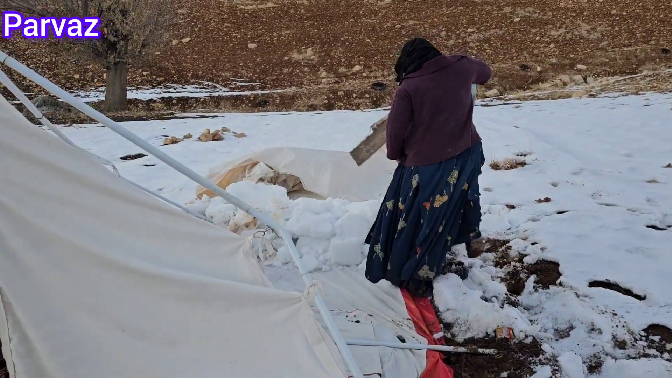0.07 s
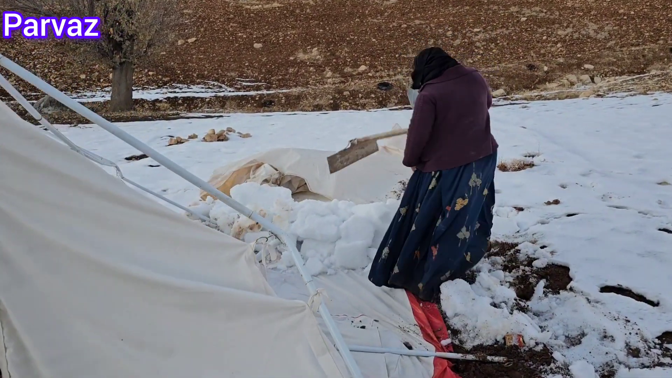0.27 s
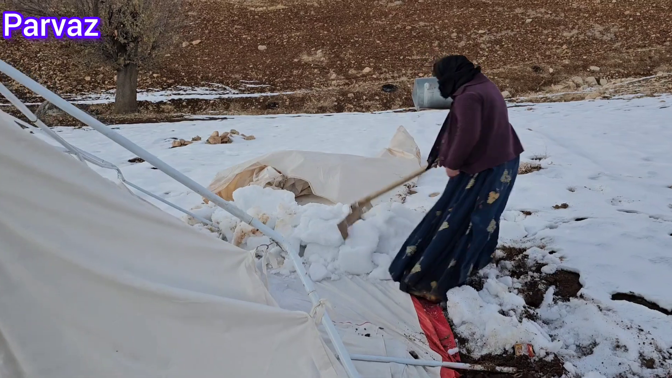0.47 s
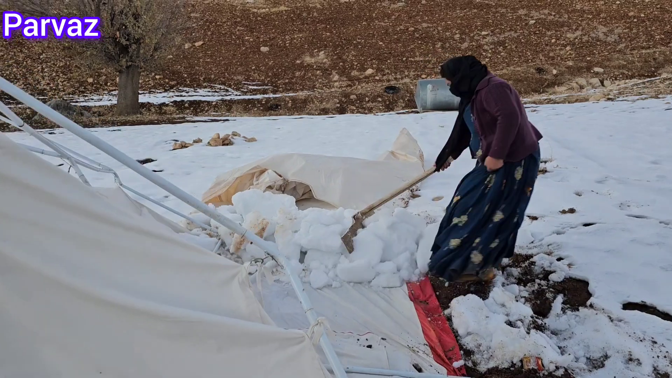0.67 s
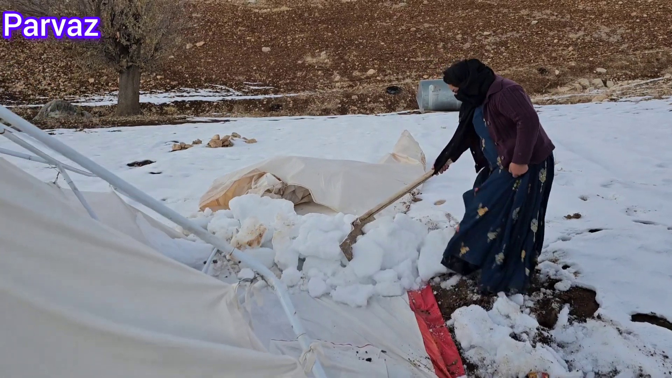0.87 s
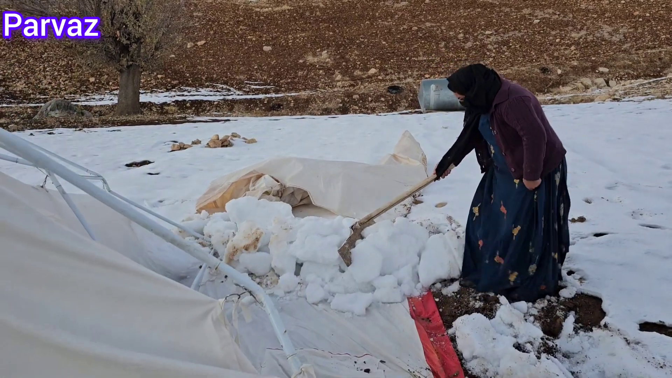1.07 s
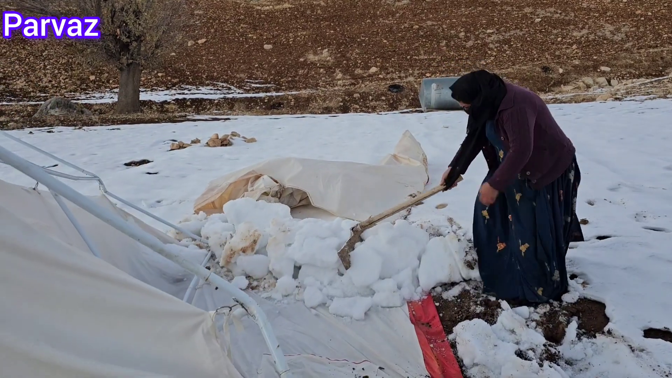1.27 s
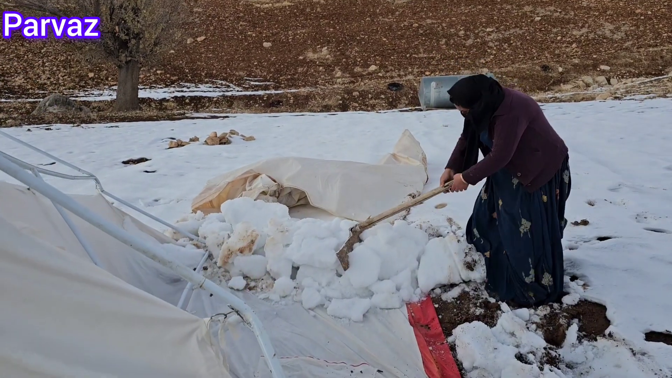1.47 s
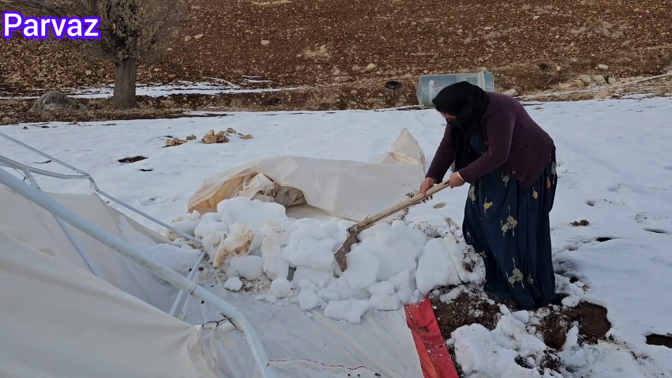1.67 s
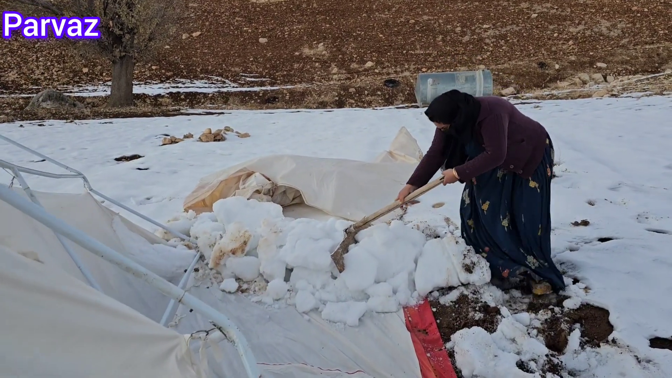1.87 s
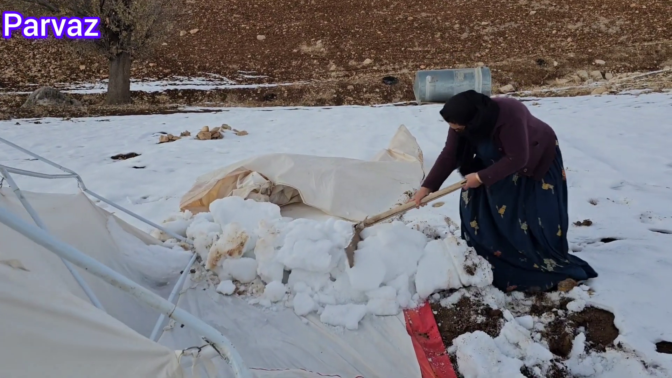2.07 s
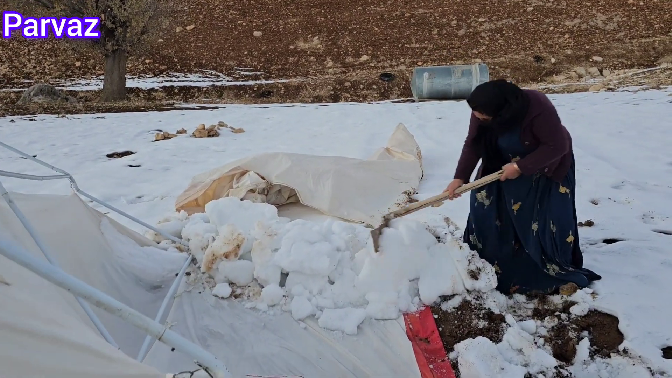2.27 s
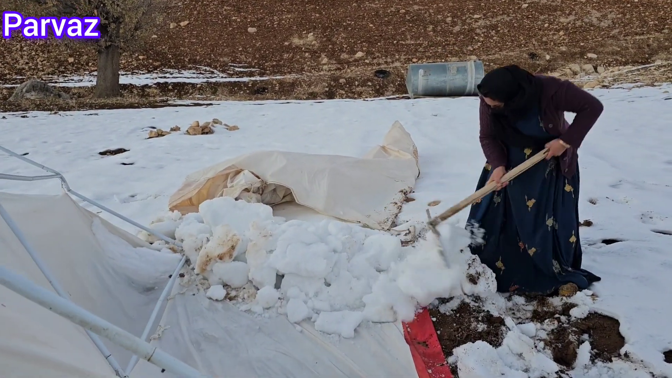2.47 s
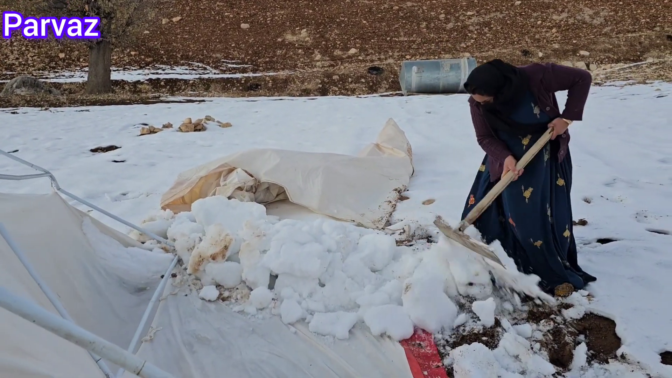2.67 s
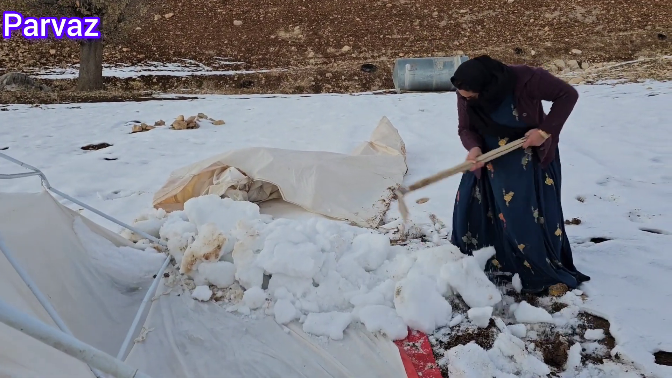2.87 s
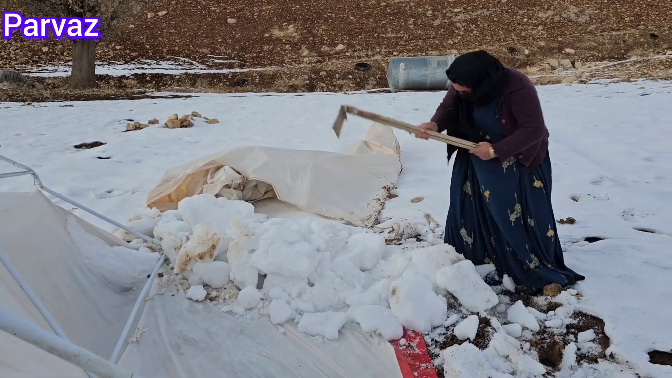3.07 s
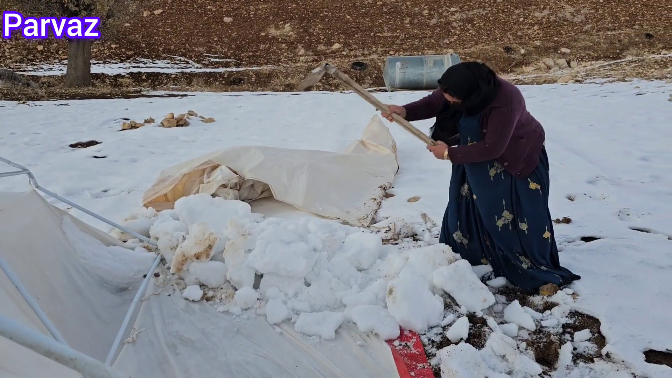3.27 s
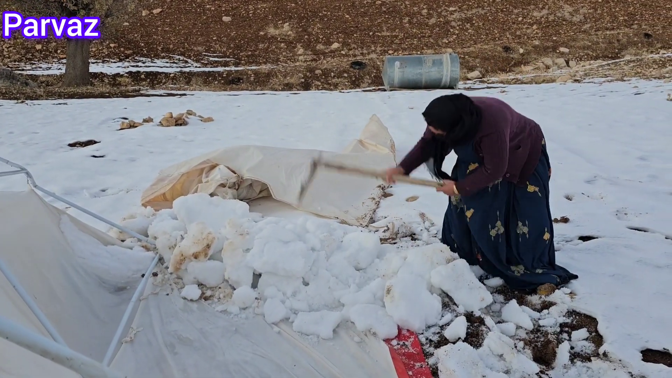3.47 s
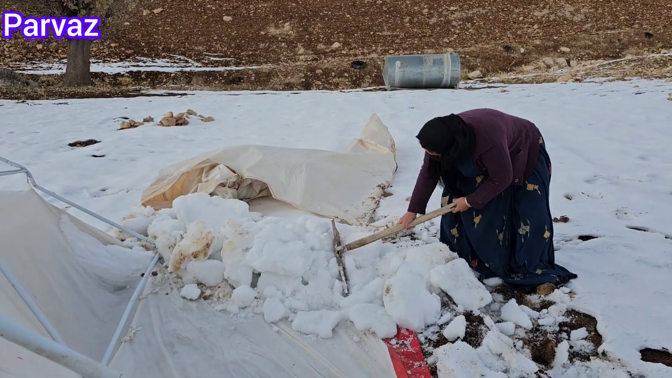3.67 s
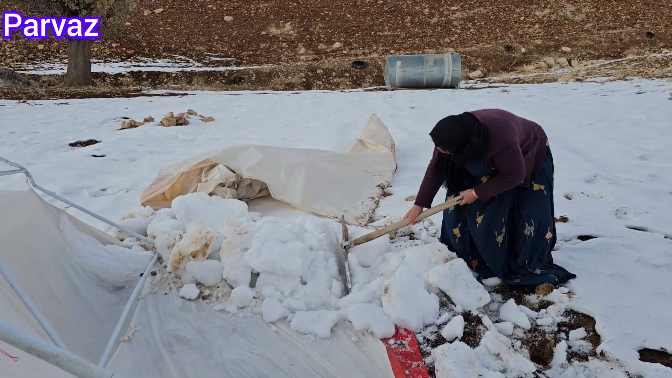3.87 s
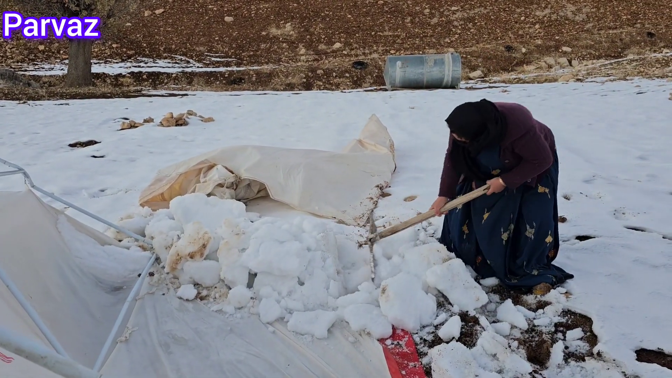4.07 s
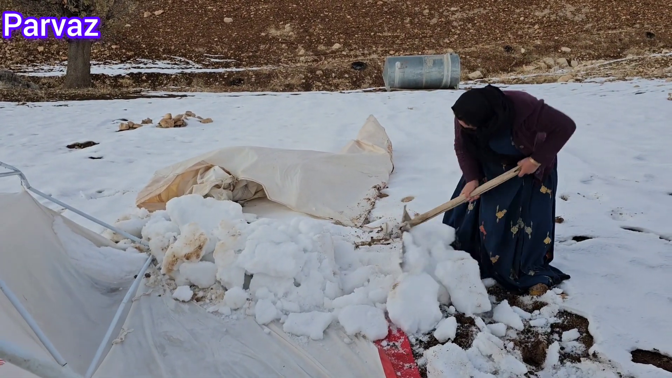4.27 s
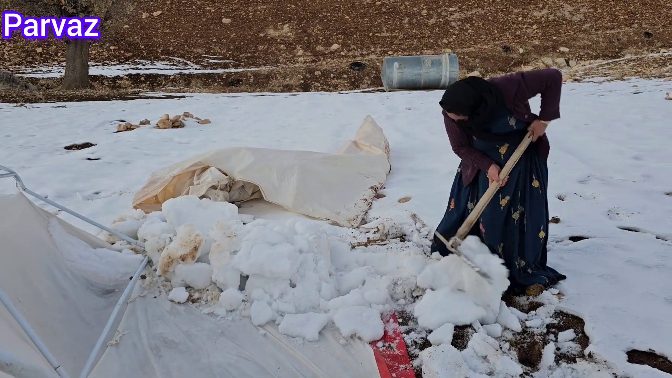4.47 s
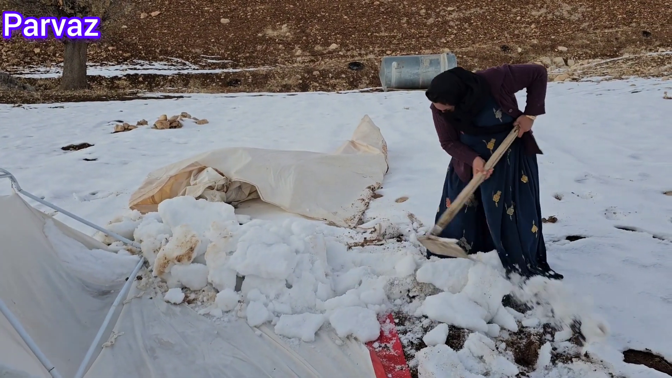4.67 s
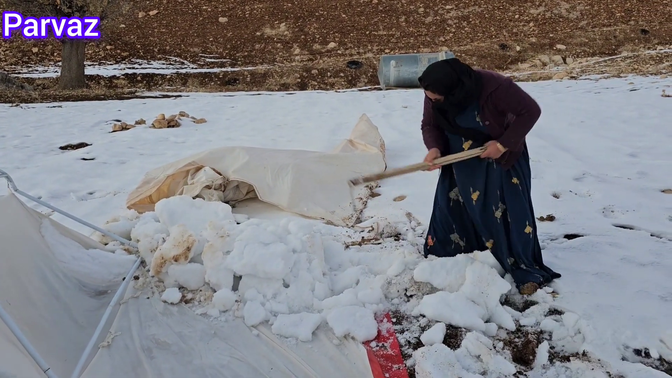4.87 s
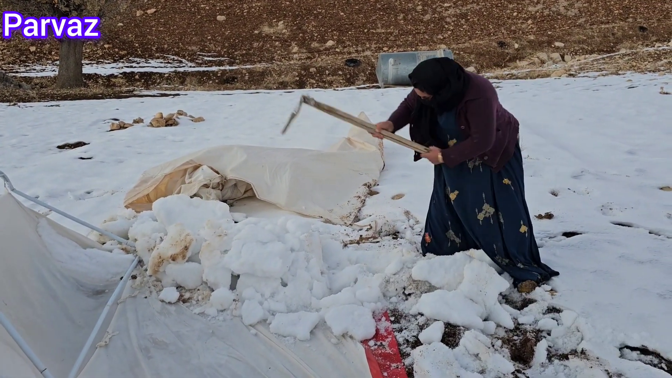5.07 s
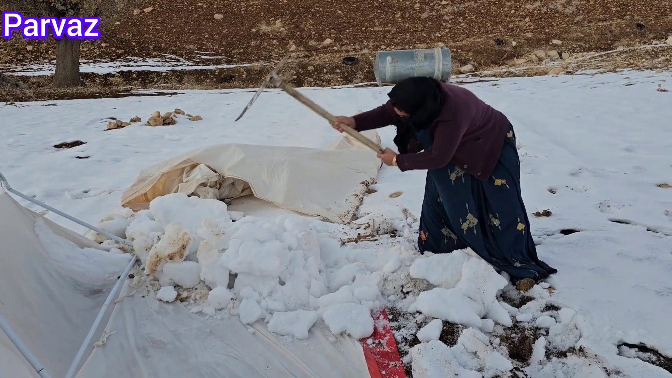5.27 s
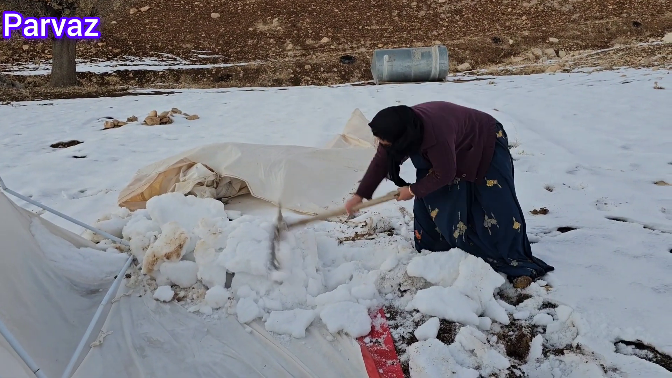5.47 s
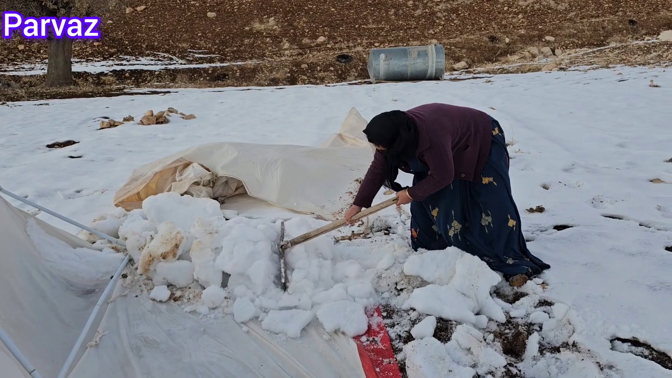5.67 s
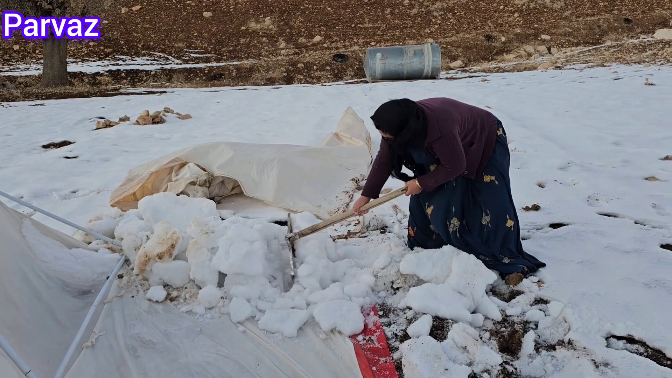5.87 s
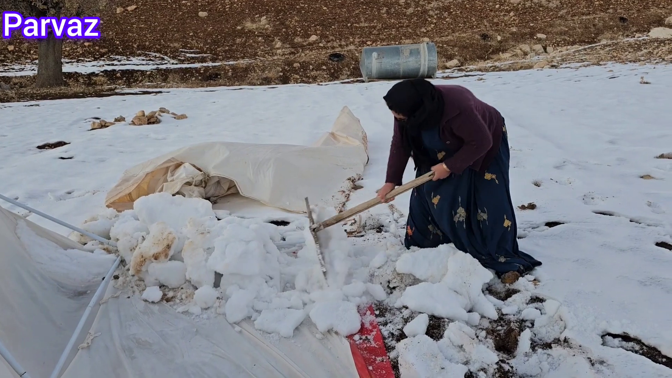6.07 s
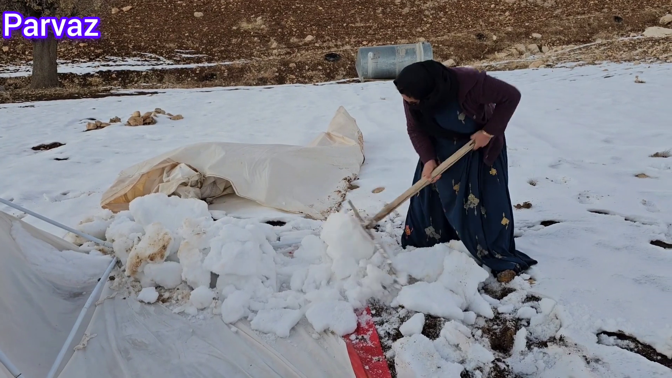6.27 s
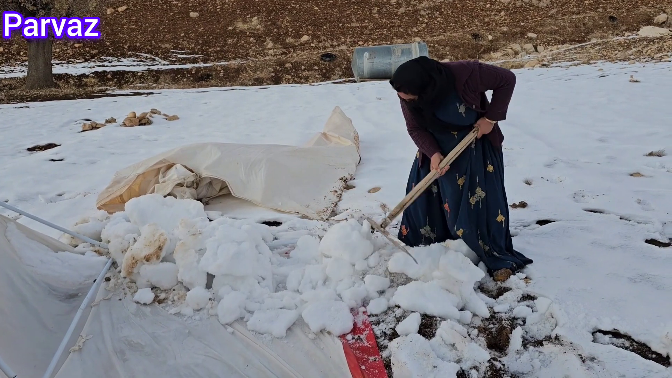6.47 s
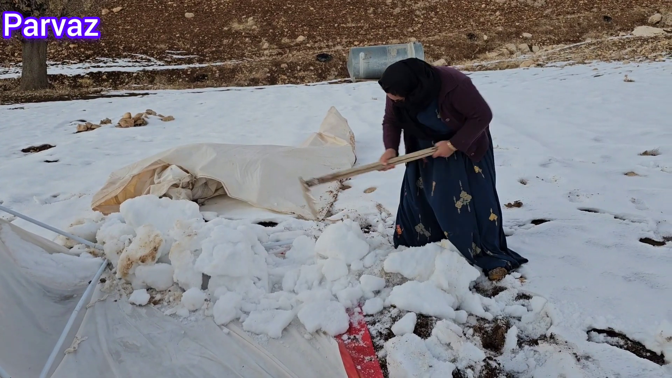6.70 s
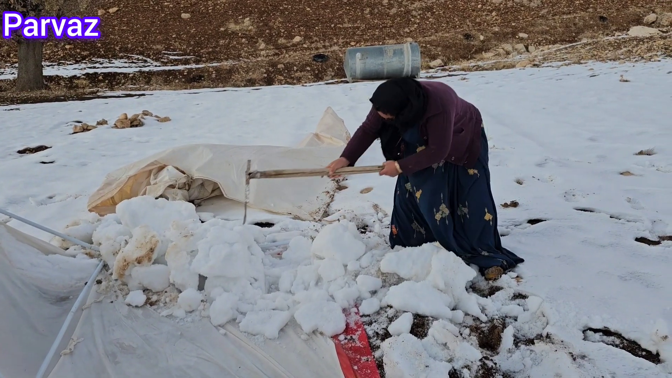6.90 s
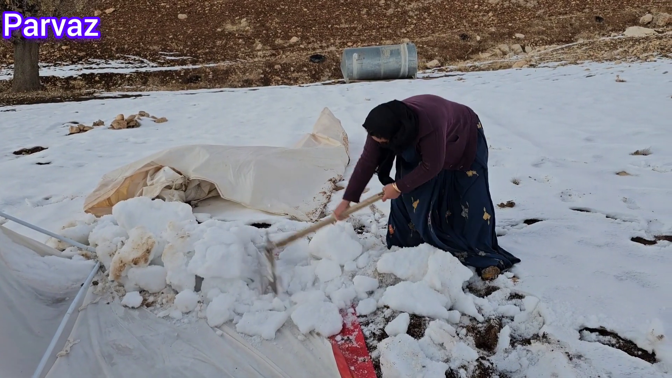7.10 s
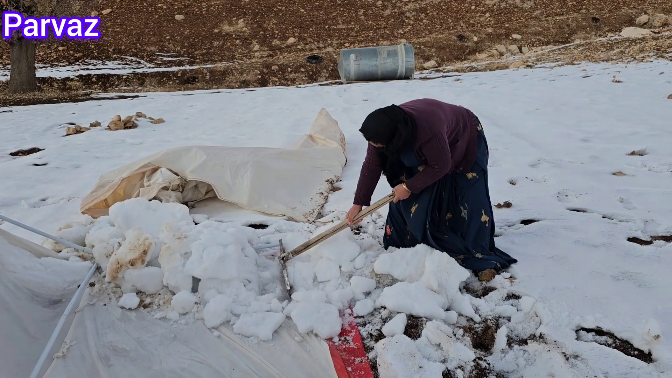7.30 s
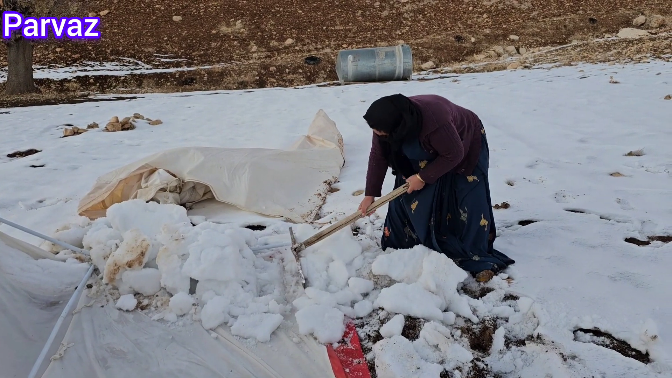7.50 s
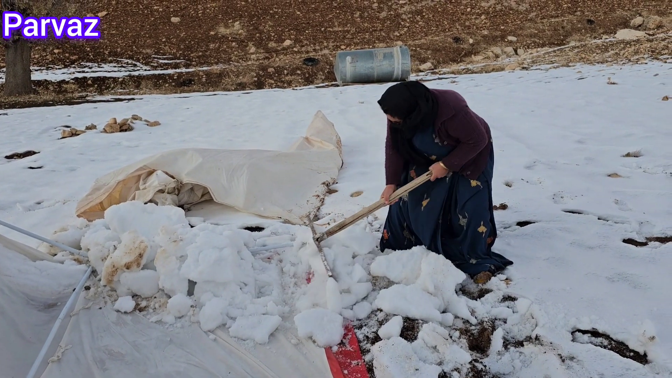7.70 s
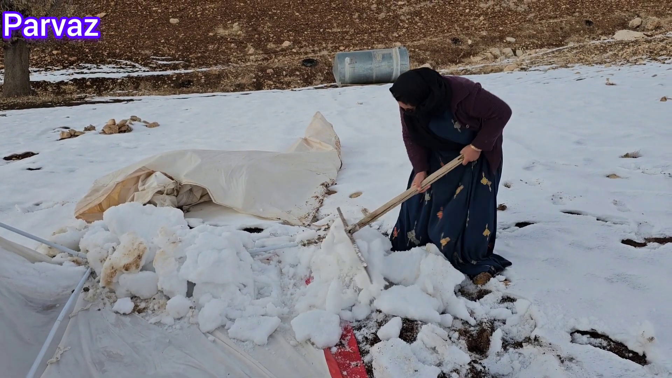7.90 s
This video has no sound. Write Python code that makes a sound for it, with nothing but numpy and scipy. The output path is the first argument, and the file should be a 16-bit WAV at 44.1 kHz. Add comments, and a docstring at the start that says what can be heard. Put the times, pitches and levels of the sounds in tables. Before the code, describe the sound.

A hoe bites into crusted snow a few steps away: four sharp, bright crunches with a very short steel ring, each followed by gritty dragging and dull lumps tumbling. Between strokes it quiets to fine trickling. A distant engine drones low underneath, and wind and handling thumps bump the hand-held stereo microphone early on.

```python
"""Hoe chopping crusted snow

A steel hoe chops four times into crusted snow and drags the lumps away, a few steps from a hand-held camera.
Snow is dense random grain clicks, filtered into crunch, dull lumps and powder; cracks and chops ring the blade.
Lumps and handling bumps are soft damped tones. A far engine drones as low tones and a roar of coloured noise;
wind buffets the two microphones as low noise in gusts."""
import sys
import numpy as np
from scipy import signal
from scipy.fft import rfft, irfft, next_fast_len
from scipy.io import wavfile
from scipy.ndimage import uniform_filter1d

SR = 44100
rng = np.random.default_rng(int(sys.argv[2]) if len(sys.argv) > 2 else 0)


def put_to_file(sound):
    """Save the sound as 16-bit audio at rate SR, in the file named by the first command-line argument."""
    columns = np.atleast_2d(sound).T  # one column per channel
    safe = np.clip(columns, -1, 1)
    whole_steps = np.round(safe * 32767)
    wavfile.write(sys.argv[1], SR, whole_steps.astype(np.int16))


N = 350154  # length in samples


def amp(db):
    """Decibels to gain."""
    return 10 ** (np.asarray(db) / 20)


def evened(x):
    """Scales to rms 1."""
    return x / np.sqrt(np.mean(x ** 2) + 1e-20)


def smooth_noise(shape, size):
    """Slowly wandering noise of rms 1: white noise averaged twice over a window of size samples."""
    noise = rng.standard_normal(shape)
    return evened(uniform_filter1d(uniform_filter1d(noise, size=size), size=size))


def read(points, hz):
    """Reads a (frequency, value) table on a log-frequency axis."""
    f, value = np.transpose(points)
    return np.interp(np.log(hz + 1), np.log(f + 1), value)


def columns(tables):
    """Per-sample values of every column, and a mask that is 1 while a table lasts."""
    t = np.arange(N) / SR
    s, *values = np.vstack(tables).T
    on = sum((t >= rows[0][0]) & (t < rows[-1][0]) for rows in tables)
    soft_on = uniform_filter1d(on * 1., size=44)  # 1 ms edges
    return soft_on, [np.interp(t, s, v) for v in values]


def add(mix, at, sound):
    """Mixes a sound in at a sample index."""
    mix[:, at:at + sound.shape[1]] += sound


def pair(near, far, gain, same, lag_s=0, lead=((0, 0), (1, 0)), patchy_db=0, pitched_db=0, size=256):
    """Colours two signals and mixes them into left and right of given likeness and delay."""
    overlap = size * 3 // 4
    hz, t, (a, b) = signal.stft([near, far], SR, nperseg=size, noverlap=overlap)
    same = np.clip(read(same, hz), 0, 1)[:, None]
    lag_now = np.interp(t * SR, np.arange(N), lag_s * np.ones(N))
    late = np.exp(-2j * np.pi * hz[:, None] * lag_now)  # the right side hears it later
    late *= np.exp(-1j * read(lead, hz))[:, None]
    wide, narrow = rng.standard_normal((2, *a.shape))
    wide = uniform_filter1d(uniform_filter1d(wide, size=5, axis=0), size=16, axis=1)  # drifting patches
    narrow = uniform_filter1d(narrow, size=14, axis=1)  # short grains that each favour one pitch
    mottle = evened(amp(patchy_db * evened(wide) + pitched_db * evened(narrow)))
    left_right = np.array([a, late * same * a + np.sqrt(1 - same ** 2) * b])
    coloured = left_right * gain(hz)[:, None] * mottle
    return signal.istft(coloured, SR, nperseg=size, noverlap=overlap)[1][:, :N]


def grains(per_s, spread_db, clumps):
    """Two trains of tiny fractures, mostly small and a few large, coming in clumps."""
    size = amp(spread_db * np.minimum(rng.exponential(1, (2, N)), 4)) * rng.standard_normal((2, N))
    struck = rng.random((2, N)) < per_s / SR
    return evened(size * struck * clumps)


def snow(levels, colour, same, rates, spread_db, flicker_db, patchy_db, pitched_db):
    """Breaking snow in three registers: crunch through the blade, dull lumps and fine powder."""
    # where the blade is: (time [s], delay of the right microphone [microseconds])
    blade_lag = [(0, 27), (1.5, -7), (2.002, -20), (2.898, -111), (3.5, 24.5), (5.401, 71), (6.3, 13),
                 (7.099, 31), (7.94, -2)]
    lag_s = np.interp(np.arange(N) / SR, *np.transpose(blade_lag)) * 1e-6
    clumps = amp(flicker_db * smooth_noise(N, 200))  # all registers break together for some milliseconds
    out = np.zeros((2, N))
    bands_hz = [(2300, 8200), (250, 2300), (8200, 17000)]  # crunch, lumps, powder
    for level, (lo, hi), per_s in zip(levels, bands_hz, rates):
        def gain(hz):
            edges = 1 / np.sqrt((1 + (lo / (hz + 1)) ** 12) * (1 + (hz / hi) ** 12))
            shape = amp(read(colour, hz)) * edges
            return shape / np.sqrt(np.mean(shape ** 2))
        near, far = level * grains(per_s, spread_db, clumps)
        out += pair(near, far, gain, same, lag_s, patchy_db=patchy_db, pitched_db=pitched_db)
    return out


def registers(on, crunch_db, lumps_db, powder_db):
    """Gains of the three registers from a crunch level and two offsets."""
    return on * amp([crunch_db, crunch_db + lumps_db, crunch_db + powder_db])


def drag():
    """Loose snow dragged, sliding and trickling: finer grains, spread wide between the microphones."""
    # one table a movement: (time [s], crunch level [dB], powder re crunch [dB])
    movements = [
        [(0.0, -66, 0), (0.038, -62, -3.5), (0.218, -66.5, -5), (0.262, -77.5, -2), (0.348, -59.5, 3),
         (0.425, -62, -2)],
        [(0.5, -40.5, -10), (0.562, -58, -3), (0.598, -55.5, -8), (0.618, -63.5, -3), (0.83, -61.5, -3),
         (0.852, -50, -15), (0.866, -60.5, -10), (0.966, -59, 0), (1.05, -74, -7)],
        [(1.05, -71, 0), (1.134, -79, -7), (1.154, -77, -8), (1.39, -66.5, -2.5), (1.458, -69, -11),
         (1.682, -74, -4.5), (1.93, -67, -6)],
        [(1.93, -72, -9), (1.946, -55.5, -12), (1.994, -43, -13), (2.034, -48, -7), (2.174, -39, -7.5),
         (2.222, -50.5, -6), (2.262, -35, -11), (2.306, -46.5, -7), (2.33, -40, -10), (2.406, -49.5, -4),
         (2.416, -45, -6), (2.466, -52.5, -2), (2.498, -37, -23), (2.53, -47, -8), (2.546, -38, -4),
         (2.6, -42.5, -13)],
        [(2.6, -42, -7), (2.736, -51, -5), (2.774, -47.5, -1), (2.87, -55, 0), (3.172, -70.5, -7),
         (3.306, -76, -28), (3.33, -84, -9)],
        [(3.6, -58, -1), (3.644, -63.5, -1), (3.738, -68.5, -1), (3.75, -55, -12), (3.766, -66, -3),
         (3.83, -48, -9), (3.948, -54, -4), (4.09, -46, -8.5), (4.124, -56.5, -3.5), (4.394, -39, -9.5),
         (4.428, -48, -5), (4.488, -49, -2), (4.62, -65, 3)],
        [(4.62, -59, 5), (4.668, -64, 5), (4.68, -52.5, 5.5), (4.912, -67.5, 5), (4.934, -67, 2),
         (5.092, -75, 9), (5.3, -85, -12.5)],
        [(5.5, -35.5, -6), (5.558, -47, -10.5), (5.568, -55, -4), (5.732, -53.5, -1), (5.794, -56.5, -5),
         (5.828, -55.5, -0.5), (6.002, -51, -5), (6.192, -44, -6.5), (6.204, -44, -8), (6.216, -56, 0),
         (6.29, -54.5, 0.5), (6.354, -64, 3), (6.36, -76, -2)],
        [(6.36, -63.5, -1), (6.406, -53, -4.5), (6.542, -71, 6.5), (6.558, -64.5, 10), (6.722, -77.5, 2.5),
         (6.742, -87, 8), (6.754, -65, -7), (6.9, -103, -8)],
        [(7.165, -55, -4), (7.193, -57, -5), (7.231, -64, -5), (7.349, -48.5, -9), (7.575, -46.5, -10),
         (7.755, -53.5, -5.5), (7.819, -50, -7), (7.861, -44.5, -9), (7.94, -44, -9)],
    ]
    # spectrum of sliding snow: (frequency [Hz], relative density [dB per Hz])
    colour = [(180, -25), (300, -12), (360, -11), (485, 0), (633, -15), (825, -7), (942, -17.5),
              (1040, -11.5), (2200, -11), (2420, -15), (3100, -9), (3670, -8.5), (5300, -12.5), (7600, -17),
              (9450, -21), (10600, -24.5), (12300, -19), (15800, -24.5)]
    # left-right match: (frequency [Hz], likeness [0 to 1])
    same = [(300, 0.39), (1700, 0.66), (3800, 0.59), (6000, 0.41), (8000, 0.096), (15800, .1)]
    on, (crunch_db, powder_db) = columns(movements)
    # lumps follow the crunch, less steeply, and trickling powder carries few of them
    lumps_level_db = -53 + 0.55 * (crunch_db + 47.5) - 0.28 * powder_db
    levels = registers(on, crunch_db, lumps_level_db - crunch_db, powder_db)
    grains_per_s = [9000, 3500, 12000]
    return snow(levels, colour, same, grains_per_s, spread_db=0.67, flicker_db=0.78,
                patchy_db=0.6, pitched_db=2.0)


def engine_tones():
    """Two low orders of the far engine's firing rate, and a second, weaker low tone."""
    # engine speed and tones: (time [s], firing rate [Hz], firing level [dB], second multiple level [dB])
    firing = [(0, 60.65, -33.5, -52), (.4, 59.68, -44, -49.5), (.75, 59.83, -35.5, -48.5),
              (1.15, 59.66, -42.5, -51), (1.6, 58.92, -47.5, -52.5), (1.9, 58.52, -40.5, -54),
              (2.6, 58.07, -42.5, -55), (3.3, 59.2, -43.5, -56), (4.5, 58.6, -44, -51.5),
              (5.5, 58.15, -44, -52), (6.3, 58.96, -43, -55), (6.8, 58.9, -40.5, -50.5),
              (7.4, 59.84, -46, -47.5), (7.65, 56.8, -41, -48), (7.94, 57.7, -40.5, -48.5)]
    # the second low tone: (time [s], frequency [Hz], level [dB])
    drone = [(1.3, 104.9, -58), (1.8, 102, -51.5), (2.4, 100.1, -48.5), (4, 100.7, -55), (5.5, 98.1, -55),
             (6.7, 104.1, -53.5), (7.2, 106.2, -54), (7.94, 105.2, -53)]
    _, (hz, first_db, second_db) = columns([firing])
    turn = 2 * np.pi * np.cumsum(hz) / SR
    first, second = amp(2.54 * smooth_noise((2, N), 3000))  # moving air makes the far tones swell and sink
    on, (drone_hz, drone_db) = columns([drone])
    tones = amp(first_db) * first * np.sin(turn)
    tones += amp(second_db) * second * np.sin(2 * turn + 1.3)
    tones += on * amp(drone_db) * np.sin(2 * np.pi * np.cumsum(drone_hz) / SR)
    return np.sqrt(2) * tones  # levels are rms


def engine_roar():
    """Smooth noise with the humps of the engine's exhaust."""
    # roar spectrum: (frequency [Hz], relative density [dB per Hz])
    colour = [(100, -33), (150, -22.5), (200, -15.5), (330, -15.5), (470, -0.5), (600, -6), (800, -13.5),
              (1150, -15.5), (1400, -7), (1800, -16.5), (2400, -32), (3600, -31), (5000, -47), (15800, -55)]
    # left-right match: (frequency [Hz], likeness [0 to 1])
    same = [(130, 0.65), (350, 0.37), (500, .8), (900, 0.17), (1400, 0.43), (3000, 0.69), (6000, .1)]
    # phase between the microphones: (frequency [Hz], lead of the left [radians])
    lead = [(200, 2.2), (500, 1.55), (900, 4.2), (1400, -1.1), (2500, 0.23)]
    roar = pair(*rng.standard_normal((2, N)), lambda hz: amp(read(colour, hz)), same, lead=lead,
                patchy_db=0.5, pitched_db=2.5, size=1024)
    return amp(-56) * evened(roar)


def wind():
    """Lumpy low buffeting, partly alike at both microphones, stronger on the windward left."""
    # gust strength: (time [s], level [dB])
    gusts = [(0.0, -50), (0.26, -40), (0.4, -50.5), (0.7, -44), (0.97, -38.5), (1.08, -49), (1.15, -34.5),
             (1.25, -44.5), (1.7, -56), (1.99, -43.5), (3.01, -49.5), (3.71, -48), (5.2, -48.5),
             (5.42, -45), (5.68, -46.5), (6.19, -46.5), (6.9, -52.5), (7.14, -39), (7.3, -48.5),
             (7.94, -48)]
    # buffeting spectrum: (frequency [Hz], relative density [dB per Hz])
    colour = [(15, -16.5), (30, 8), (45, 1), (80, 6.5), (110, -2), (150, -13.5), (250, -21), (500, -31),
              (900, -65)]
    # balance of the wind: (time [s], left minus right [dB])
    balance = [(0, 18), (1.3, 12), (2.5, 1), (4, 6), (7.94, 0.5)]
    gust = amp(columns([gusts])[1][0] + 2.3 * smooth_noise(N, 2500))
    lean_db = columns([balance])[1][0] / 2
    same = [(20, 0.85), (80, 0.58), (200, 0.83)]  # (frequency [Hz], likeness [0 to 1])
    flow = pair(*rng.standard_normal((2, N)), lambda hz: amp(read(colour, hz)), same, size=4096)
    return gust * amp([lean_db, -lean_db]) * evened(flow)


def knock(s, db, hz, rise, t60, lean_db, second):
    """A soft, damped tone with a weaker partner of chance pitch and phase."""
    t = np.arange(SR // 2) / SR
    ratio, turn = second
    partner_hz = hz * (1.7 + 0.383 * ratio)
    tone = np.sin(2 * np.pi * hz * t) + .5 * np.sin(2 * np.pi * (partner_hz * t + turn))
    decay = amp(db - 60 * np.maximum(t - rise, 0) / max(t60, .01))
    shape = np.minimum(t / max(rise, .001), 1) * decay
    return round(s * SR), amp([[lean_db / 2], [-lean_db / 2]]) * shape * tone


def bumps():
    """Low thumps through the camera body as it is handled, louder at the left port."""
    # handling thumps: (time [s], level [dB], pitch [Hz], rise [s], t60 [s])
    thumps = [(0.045, -29.5, 75.3, 0.0059, 0.19), (0.202, -28.5, 60, 0.017, 0.28),
              (0.482, -37.5, 62.4, 0.014, 0.29), (0.689, -33, 62, 0.087, 0.12),
              (.935, -29, 71.2, 0.0137, 0.23), (1.14, -29.5, 78, 0.0061, 0.081)]
    out = np.zeros((2, N + SR))
    for row, second in zip(thumps, rng.random((len(thumps), 2))):
        add(out, *knock(*row, lean_db=11, second=second))
    return out[:, :N]


def cracks():
    """Gains of single cracks: a rise of a few milliseconds, a short spray and a faint patter of crumbs."""
    # cracks of crust and ice: (time [s], crunch level [dB], lumps re crunch [dB], powder re crunch [dB])
    breaks = [(0.152, -52, 7, 4), (0.207, -60, 13.5, 5), (0.4448, -41, -16, -21), (0.4675, -16, -20, -22),
              (0.7322, -47.5, -14, -8), (0.848, -35.5, 0.5, -2.5), (1.195, -60, -10, 3),
              (1.2171, -55, -5, -23), (1.596, -65, 10, 6), (1.9751, -48, -9, -24), (2.2358, -31, -19, -21),
              (2.326, -31.5, -10, -20), (2.4915, -30, 6.5, 1.5), (2.548, -33.5, 8.5, 0),
              (2.6188, -32, 1.5, -6), (2.6591, -47, 8, -11), (2.784, -46, 14, 8), (3.0042, -44, 1, -21),
              (3.0924, -52.5, 8.5, 1), (3.241, -53.5, 4, -10), (3.3544, -41, -1, -5), (3.3604, -53, 9, -8),
              (3.5334, -18.5, -24, -25), (3.5375, -13, -11.5, -18), (3.5507, -33, -18, -23),
              (3.7475, -46, -12, -21), (3.861, -40, 1, -21), (4.6765, -43, -7, -5),
              (4.938, -48.5, -11, 6.5), (5.0046, -55, -7, -7), (5.444, -20.5, -24, -13),
              (5.461, -16, -15, -15.5), (5.4734, -17.5, -0.5, -28), (5.4853, -16.5, -6, -17),
              (5.5507, -35, -18, -14), (5.5575, -48, -18, -23), (5.84, -40.5, -3, -17),
              (6.0926, -40, -23, -19), (6.406, -53, 12, -15), (6.558, -50, -13, 3), (6.701, -59, -15, 2),
              (6.7543, -58.5, -3, -17), (6.8294, -62.5, 0, -6), (7.1056, -23, -20, -8),
              (7.1163, -25, -13.5, -20), (7.135, -28, 2.5, -21.5)]
    power = np.zeros((3, N + SR))
    t = np.arange(SR // 4) / SR
    spray = amp(-60 * t / 0.023)  # t60 23 ms
    patter = amp(-21 - 60 * t / 0.18)  # t60 180 ms
    shape = np.minimum(t / 0.0044, 1) * (spray + patter)
    for s, *levels_db in breaks:
        add(power, round(s * SR), registers(shape[None], *np.array(levels_db)[:, None]) ** 2)
    return np.sqrt(power[:, :N])


def chop(start, entry_db, bite_s, stop_db, lumps_db, powder_db):
    """Corner points of one blow: first contact, entry, stop, end of the fall."""
    entry_s, entry_rise_db, fall_s, fall_db = 0.016, 14.5, .035, 29
    lumps_gain_db = 0.5  # lumps grow as the blade digs in
    early_powder_db = powder_db + 5  # powder sprays mostly at first contact
    stop = start + max(bite_s, 2 * entry_s)
    return [(start, entry_db - entry_rise_db, lumps_db, early_powder_db),
            (start + entry_s, entry_db, lumps_db, early_powder_db),
            (stop, stop_db, lumps_db + .5 * lumps_gain_db, powder_db),
            (stop + fall_s, stop_db - fall_db, lumps_db + lumps_gain_db, powder_db)]


def ring(x):
    """The steel blade rings briefly at its modes, each decaying faster the wider it is."""
    # steel modes, damped by snow: (frequency [Hz], width [Hz], relative level [dB])
    blade_modes = [(3260, 89, -4.5), (3735, 45, -0.5), (4350, 72, -5), (4920, 180, 4.5), (5357, 62, 3.5),
                   (6710, 110, -2), (7680, 52, 0)]
    t = np.arange(2000) / SR
    modes = sum(amp(db) * np.exp(-np.pi * width * t) * np.sin(2 * np.pi * hz * t)
                for hz, width, db in blade_modes)
    return signal.oaconvolve(x, modes[None] / np.linalg.norm(modes), axes=1)[:, :N]


def blows():
    """Chops and cracks: snow breaking at one spot and shaking the blade."""
    # the blade bites, crunches on until it stops, then the sound falls away: (start [s], entry level [dB],
    # bite length [s], stop level [dB], lumps re crunch at entry [dB], powder re crunch at the stop [dB])
    bites = [(0.431, -36, 0.046, -24.5, -11, -16.5), (3.53, -30, 0.046, -30, -8, -10.5),
             (5.439, -24.5, 0.041, -22, -11, -11.5), (7.1, -33, 0.033, -32.5, -6.5, -6)]
    # spectrum of chopped snow: (frequency [Hz], relative density [dB per Hz])
    colour = [(180, -51), (300, -16.5), (366, -20.5), (536, -8.5), (665, -13), (974, -14), (1400, -10),
              (2390, -10), (3440, 0), (4870, -1.5), (5650, -2), (7490, -4), (10600, -10), (11900, -6.5),
              (15800, -14)]
    # left-right match: (frequency [Hz], likeness [0 to 1])
    same = [(300, 1), (1700, 0.83), (4500, 0.37), (7500, 0.58), (9500, 0.12), (15800, 0.6)]
    on, blow_db = columns([chop(*row) for row in bites])
    levels = np.hypot(registers(on, *blow_db), cracks())
    grains_per_s = [15000, 8000, 20000]
    broken = snow(levels, colour, same, grains_per_s, spread_db=1.0, flicker_db=-1.1,
                  patchy_db=1.44, pitched_db=2.5)
    return broken + amp(-12) * ring(broken)


def lumps():
    """Short dull knocks of the blade stopping and of lumps dropping in the snow."""
    # knocks: (time [s], level [dB], pitch [Hz], t60 [s], left minus right [dB])
    drops = [(0.923, -43.5, 407, 0.033, 0.0), (0.939, -36.5, 162, 0.052, 3), (0.962, -38, 169, 0.019, 1.0),
             (1.144, -47, 181, 0.025, 24), (1.998, -46, 425, 0.083, 7), (2.048, -45, 445, 0.076, 5),
             (2.331, -44, 482, 0.077, -6), (2.488, -39.5, 820, 0.12, -2), (2.782, -46, 702, 0.049, 1),
             (3.256, -47.5, 180, 0.1, 20), (3.54, -35, 218, 0.093, -7), (3.56, -40, 177, 0.037, -10),
             (4.276, -47.5, 510, 0.085, -5.5), (4.345, -43.5, 768, 0.23, -3), (4.384, -43.5, 490, 0.11, -2),
             (4.472, -45, 478, 0.075, -1), (4.558, -52, 540, 0.081, 6), (5.457, -31, 238, 0.067, -3.5),
             (5.462, -34.5, 176, 0.091, -3), (5.471, -35, 517, 0.054, -8), (5.743, -51, 238, 0.08, 2),
             (5.923, -42, 256, 0.061, -1), (7.114, -41, 247, 0.079, -6), (7.132, -33.5, 235, 0.049, -7),
             (7.549, -43.5, 476, 0.066, -1), (7.894, -49, 510, 0.07, 6)]
    out = np.zeros((2, N + SR))
    for (s, db, hz, t60, lean_db), second in zip(drops, rng.random((len(drops), 2))):
        add(out, *knock(s, db, hz, .004, t60, lean_db, second))
    return out[:, :N]


def scene():
    """Everything that reaches the microphones."""
    hoe = drag() + blows() + lumps()
    engine = engine_tones() + engine_roar()
    return hoe + engine + wind() + bumps()


def record(dry):
    """The two microphone ports lean left or right by frequency; then the band limit."""
    # balance of the ports: (frequency [Hz], left minus right [dB])
    ports = [(60, -5), (350, -3.5), (1000, -1), (2400, 2), (4400, 5.5), (6000, -1), (8000, -2),
             (10000, -5.5), (11500, 1), (15500, 0.5)]
    size = next_fast_len(N + 4096)
    lean_db = read(ports, np.fft.rfftfreq(size, 1 / SR)) / 2
    tilted = irfft(rfft(dry, size) * amp([lean_db, -lean_db]), size)[:, :N]
    edge_hz = 15870
    low_pass = signal.firwin(1023, edge_hz, window=("kaiser", 9), fs=SR)
    return signal.oaconvolve(tilted, low_pass[None], "same")


dry = scene()
out = record(dry)
put_to_file(out)
```